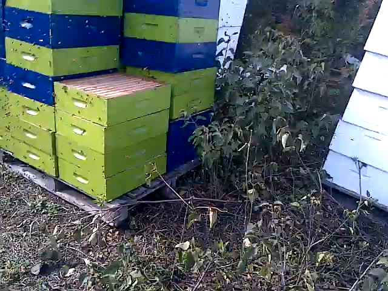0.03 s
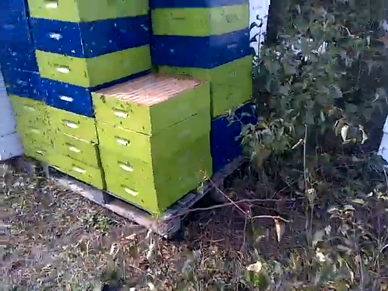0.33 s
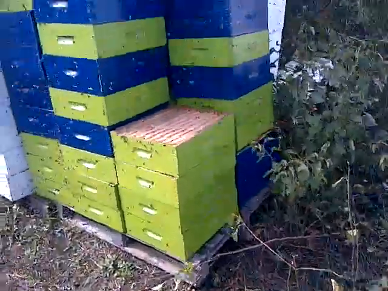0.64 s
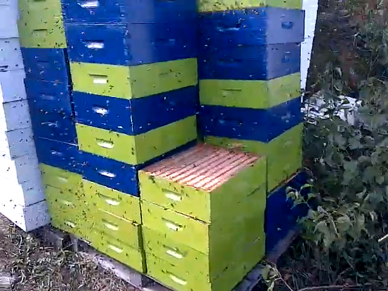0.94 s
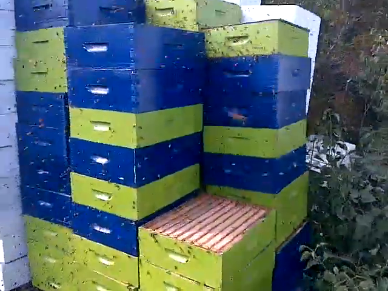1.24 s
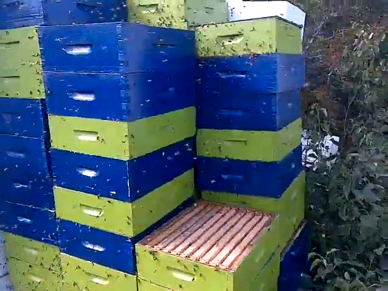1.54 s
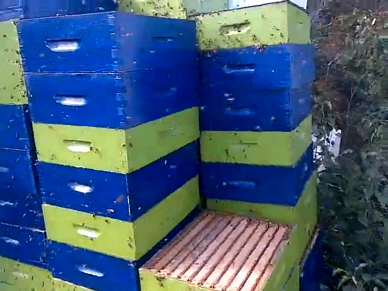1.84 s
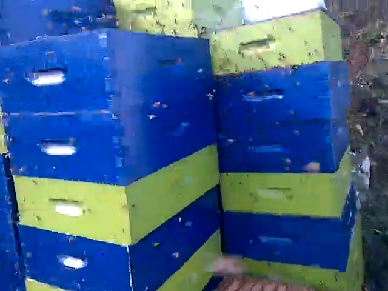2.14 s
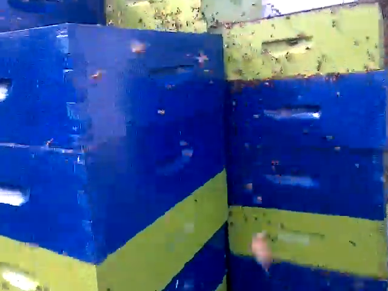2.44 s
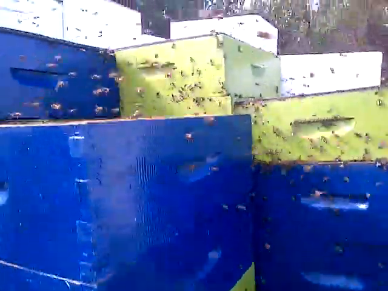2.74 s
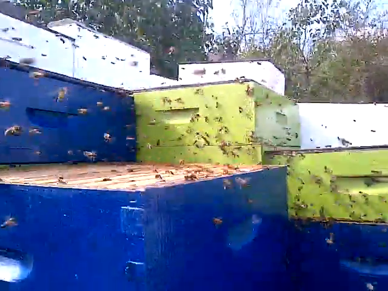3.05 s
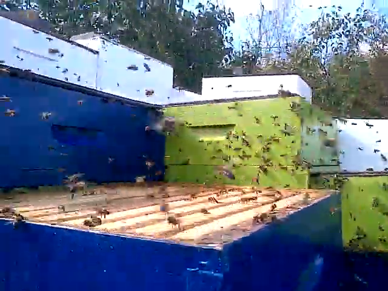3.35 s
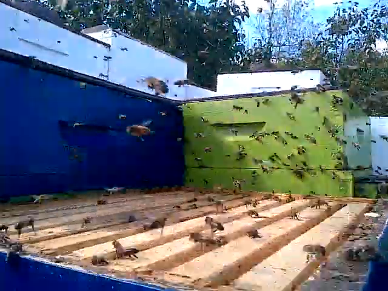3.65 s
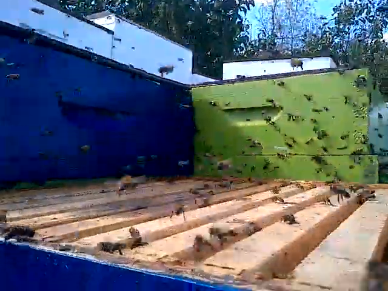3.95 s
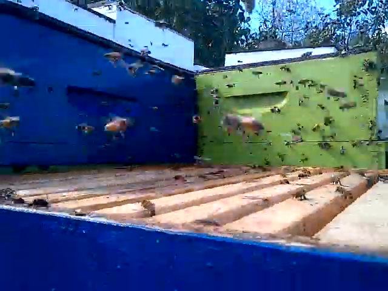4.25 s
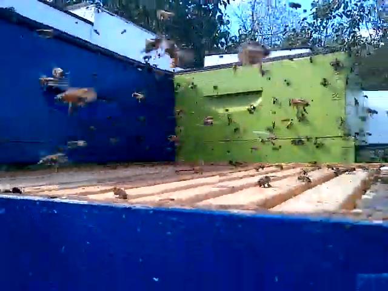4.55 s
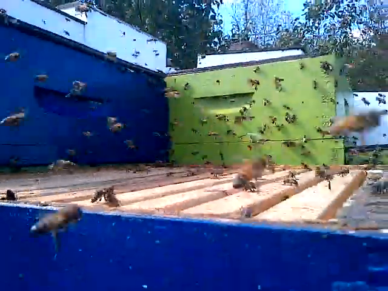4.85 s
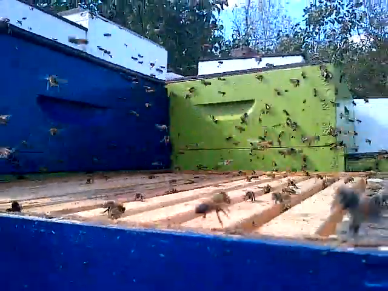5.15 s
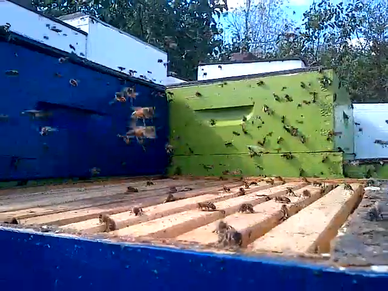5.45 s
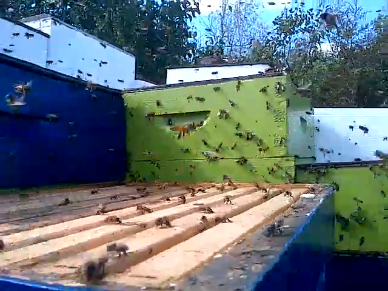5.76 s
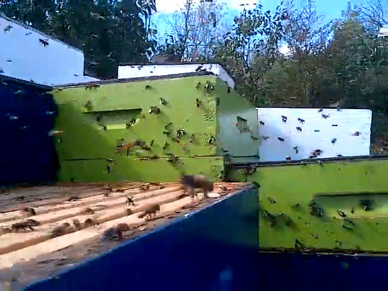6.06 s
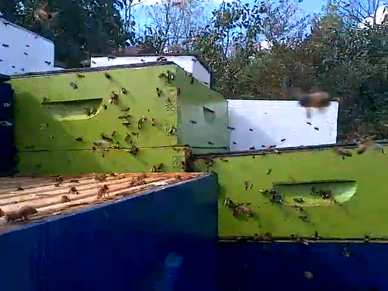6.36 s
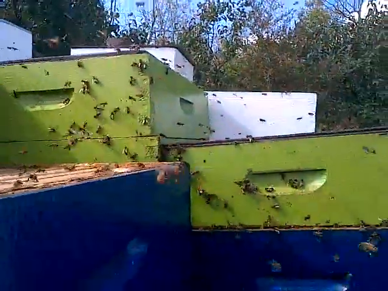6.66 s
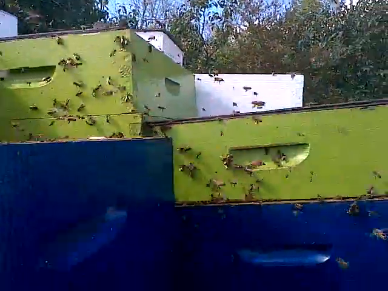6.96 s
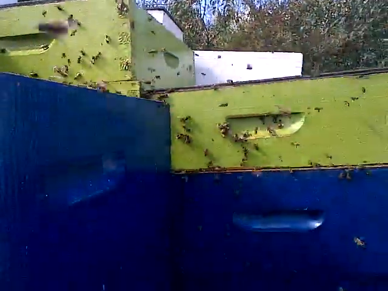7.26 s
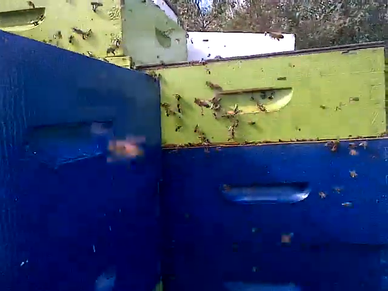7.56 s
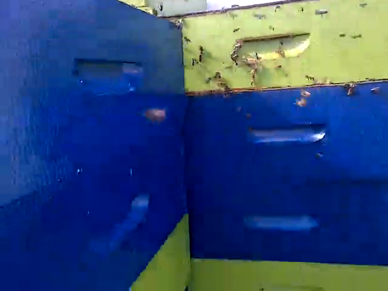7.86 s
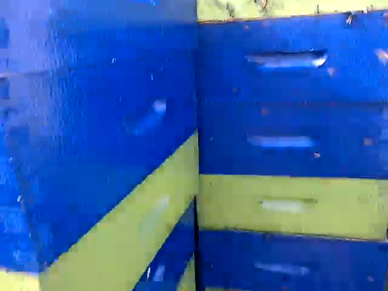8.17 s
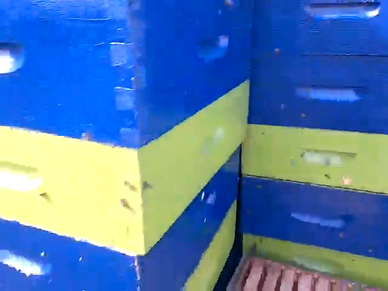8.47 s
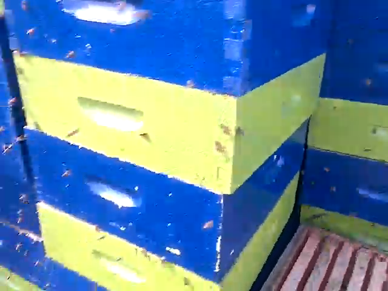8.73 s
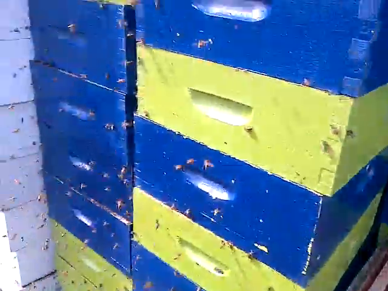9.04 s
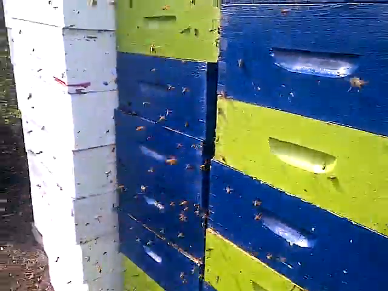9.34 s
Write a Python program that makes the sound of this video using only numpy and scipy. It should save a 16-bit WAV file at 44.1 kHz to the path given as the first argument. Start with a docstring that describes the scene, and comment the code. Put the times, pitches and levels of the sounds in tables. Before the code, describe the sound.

A dense swarm of honey bees buzzes louder and closer around hives, with light footsteps crunching dry leaves and twigs early on.

```python
"""Walking into a bee swarm

Honey bees swarm around wooden hives outdoors: many wingbeats blur into one rasping buzz that
throbs with brief, uneven swells of tone. Someone walks up over crackling leaves and snapping
twigs and holds the microphone into the thick of it. A faint low hum and moving air lie underneath."""
import sys
import numpy as np
from scipy import signal
from scipy.fft import rfft, irfft
from scipy.io import wavfile
from scipy.ndimage import uniform_filter1d, map_coordinates

SR = 44100
rng = np.random.default_rng(int(sys.argv[2]) if len(sys.argv) > 2 else 0)


def unload_audio(sound):
    """Save the sound as a 16-bit wav file, at the path given as the first command line argument."""
    columns = np.transpose(np.atleast_2d(sound))
    # keep every value between -1 and 1, then stretch to whole-number steps
    steps = np.round(np.clip(columns, -1, 1) * 32767)
    wavfile.write(sys.argv[1], SR, steps.astype(np.int16))


N = 423360
TIME = np.arange(N) / SR
THICK_DB = -36.5   # base level in the thick of the swarm; near_db is counted from here


def swarm(near_db, rasp_db=-1.17, air_db=-5.5, split_hz=2400):
    """The hum and rasp of the crowd over the rush of air from its wings, all growing with nearness."""
    # Air stirred by the wings. Each row: frequency in Hz, noise density in dB.
    wing_air = [(60, -23.5), (120, -23.5), (170, -5.5), (320, -0.5), (600, 0.5), (1200, -3), (2000, -5),
                (4000, -15), (7000, -31), (8000, -55.5)]
    beat, octave, rasp = crowd()
    body = signal.sosfiltfilt(signal.butter(4, split_hz, fs=SR, output="sos"), rasp)
    # In the near field, over the last dB of the approach, the wingbeat tone gets an extra lift.
    near_field_db = 4.5 * np.exp(np.minimum(near_db, 0) / .5)
    hum = from_db(-8 + 1.06 * near_db + near_field_db) * steady(beat)
    hum += from_db(-1 + .94 * near_db) * steady(octave)
    edge = from_db(-11 + .85 * near_db) * steady(rasp - body)
    air = from_db(air_db) * coloured(rng.standard_normal(N), wing_air)
    return from_db(THICK_DB) * (hum + edge + from_db(near_db) * (from_db(rasp_db) * steady(body) + air))


def crowd(wingbeat_hz=240.43, spread=.1, swerve=.033, flutter=.011, count=128, size=4096):
    """Many bees, each with its own wandering wingbeat and distance. Returns fundamental, octave, rasp."""
    hold = 30   # samples per flight step; the buzz is built at half rate
    times = TIME[::2 * hold]
    sine = np.sin(2 * np.pi * np.arange(size) / size)
    octave = np.tile(sine[::2], 2)
    out = np.zeros((3, len(times) * hold))
    for pitch in np.linspace(-1, 1, count):
        slowing = .16 * np.clip(wander(2, times) - 1, 0, 1)   # now and then a bee slows to land
        detune = spread * pitch + swerve * wander(5, times) + flutter * wander(28, times)
        beat_hz = wingbeat_hz * np.exp(detune - slowing)
        cycle = rng.random() + np.cumsum(np.repeat(beat_hz, hold)) * 2 / SR
        place = (cycle * size).astype(int) % size
        nearness = from_db(11 * np.tanh(wander(6, times) / 2))   # the crowd keeps some distance
        for part, shape in zip(out, (sine, octave, wing_stroke(wingbeat_hz, scatter_rad=1.38))):
            facing = from_db(2 * wander(8, times))   # each part beams its own way as the bee turns
            part += shape[place] * np.repeat(nearness * facing, hold)
    return signal.resample_poly(out, 2, 1, axis=1)[:, :N]


def wing_stroke(beat_hz, scatter_rad, size=4096):
    """One cycle of rasp: a sharp flick of the wings, smeared differently each time."""
    # Colour of the stroke from the third harmonic up. Each row: frequency in Hz, level in dB.
    rasp_colour = [(600, -3), (750, 2.5), (950, 1), (1250, 1), (1600, -2), (2000, -8.5), (2500, -11),
                   (3100, -12.5), (3800, -17), (5100, -17), (6000, -21.5), (6800, -32.5), (7600, -45)]
    orders = np.arange(3, 34)
    gains = gain_at(rasp_colour, orders * beat_hz) * from_db(rng.normal(0, 1.9, len(orders)))
    harmonics = np.zeros(size // 2 + 1, complex)
    harmonics[orders] = gains * np.exp(1j * rng.normal(0, scatter_rad, len(orders)))
    return rms_one(irfft(harmonics))


def buzz_surges(sag=.006, glide_s=.07, waver=.009, rasp_db=-8):
    """Brief, gliding swells of the swarm's hum: the throb of many wingbeats adding up by chance."""
    # Swells of tone. Each row: peak time in seconds, fundamental in Hz, level in dB, fundamental
    # against octave in dB, half length of the swell in seconds, pitch climb as a share per second.
    surges = [(1.19, 243.4, -59, 3, 0.03, 0.18), (1.33, 248.8, -50.5, -14, 0.049, .5),
              (1.55, 243.6, -46, -9, 0.023, .7), (1.71, 240.4, -43.5, -18, .03, 0.65),
              (1.799, 236, -43, -5, 0.019, -1.3), (1.91, 247.5, -53.5, 2, .04, 0.11),
              (1.991, 244.6, -48, -13, 0.02, 0), (2.319, 238.4, -42.5, -9, .035, -0.54),
              (2.377, 229, -44, -15, 0.016, -0.024), (2.76, 251, -44, -0.5, 0.041, .7),
              (2.82, 248, -40, -24.5, 0.031, 0), (3.03, 242.5, -37.5, -17, 0.024, -.7),
              (3.32, 241.2, -37.5, -21, 0.029, -.7), (3.47, 262, -46.5, 1.5, 0.02, .7),
              (3.53, 237, -38, -21, 0.043, 0), (3.819, 244.3, -38, -18, 0.036, .7),
              (3.882, 244.7, -48, 5, 0.045, 0.59), (4.01, 220.2, -39, -6, 0.031, 1.31),
              (4.169, 240, -42.5, 0.5, 0.045, -1.2), (4.33, 229.7, -37.5, -7, 0.029, 1.31),
              (4.43, 237.7, -37.5, -8, 0.028, -1.3), (4.669, 241, -49, 4.5, .03, 0),
              (4.751, 211, -34.5, -9, 0.035, 0.33), (4.757, 249, -35, -23, 0.03, 0),
              (4.86, 224.2, -40, -4, 0.026, 0.75), (5.20, 224.3, -42.5, 1, 0.054, -0.53),
              (5.40, 226, -42.5, -14, .035, 0.17), (5.67, 252.4, -39, -14, 0.049, 0),
              (5.794, 236.5, -36, -24, 0.042, 1.33), (5.89, 238.4, -44, -1, 0.02, -0.11),
              (6.00, 190, -48.5, -1.5, 0.068, -0.1), (6.00, 249, -39, -3, 0.027, .7),
              (6.12, 223.3, -40.5, -18, 0.045, -1.35), (6.33, 237.6, -38, -7, 0.04, -0.16),
              (6.68, 229, -39.5, -3.5, 0.034, -1.37), (6.799, 246.3, -45, 0, .028, 0),
              (6.87, 227, -39.5, -20, 0.035, 1), (7.10, 252, -42.5, -13, 0.045, -0.24),
              (7.46, 239.3, -45, -3, 0.028, 1.3), (7.62, 245, -43, -16, 0.024, 0),
              (7.70, 246, -42.5, -6, 0.036, 0.63), (8.14, 247.7, -41, -14, 0.036, .7),
              (8.28, 239.9, -38, -2, 0.067, 0), (8.54, 251.2, -39, -14, .04, 0),
              (8.86, 241.7, -41, -18, 0.046, 1.22), (9.34, 242, -46, -12, 0.026, 0),
              (9.529, 242, -46, -5, 0.04, -0.18)]
    out = np.zeros(N)
    for at_s, beat_hz, level_db, beat_db, half_s, climb in surges:
        span = np.abs(TIME - at_s) < .5
        offset = (TIME[span] - at_s) / half_s
        falloff = np.hypot(1, offset)
        glide = climb * glide_s * np.tanh(offset * half_s / glide_s)
        glide -= sag * offset / falloff   # a slight downward bend across the peak
        cycle = np.cumsum(beat_hz * (1 + glide + waver * wander(25, TIME[span]))) / SR
        stroke = wing_stroke(beat_hz, scatter_rad=1.07)
        hum = np.sqrt(2) * (from_db(beat_db) * np.sin(2 * np.pi * cycle) + np.sin(4 * np.pi * cycle))
        rasp = from_db(rasp_db) * stroke[(cycle % 1 * len(stroke)).astype(int)]
        envelope = np.hanning(len(cycle)) / falloff ** 2
        out[span] += from_db(level_db) * (hum + rasp) * envelope
    return out


def footsteps(cracks_per_s=1700, crack_s=.00059):
    """Each sole sets off a shower of tiny, uneven leaf cracks, dry bursts that die at once."""
    # Soles pressing down. Each row: peak time in seconds, level in dB, half length in seconds.
    steps = [(0.373, -58, 0.026), (0.478, -59.5, 0.024), (1.124, -59.5, 0.042), (1.234, -55, 0.025),
             (1.296, -56, 0.022), (1.38, -56.5, 0.085), (2.118, -51.5, 0.13), (2.258, -43.5, 0.017),
             (2.317, -36.5, 0.023), (2.388, -45.5, 0.04), (2.768, -44, 0.015), (2.835, -46.5, 0.016),
             (2.907, -45, 0.022), (3.04, -51.5, 0.17), (3.33, -42.5, 0.018)]
    # Crunch of dry leaves. Each row: frequency in Hz, noise density in dB.
    leaf_colour = [(100, -28), (250, -4.5), (500, -4), (1300, -2), (2300, -3.5), (3500, -2), (5200, -1),
                   (6300, -7), (7200, -20.5), (8000, -22.5)]
    onsets = rng.random(N) < cracks_per_s / SR
    cracks = onsets * from_db(2 * np.minimum(rng.exponential(1, N), 4))
    energy = signal.lfilter([1], [1, -np.exp(-2 / (crack_s * SR))], cracks ** 2 + 1e-18)
    return swells(steps) * coloured(np.sqrt(energy) * rng.standard_normal(N), leaf_colour)


def twigs(crack_s=.0011, splinter_db=-17, splinter_s=.0083, ring_db=4, size=2500):
    """A snap is a short, broad crack that barely rings in the twig, with a softer trail of splinters."""
    # Twigs and stalks breaking. Each row: start in seconds, level of the crack in dB, ring in Hz.
    snaps = [(0.4648, -56, 3150), (0.471, -59, 4200), (0.4775, -56, 3500), (1.0894, -53, 2800),
             (1.2337, -45, 2400), (1.3006, -43, 3400), (1.3092, -45.5, 2800), (1.3252, -46.5, 4200),
             (1.347, -50, 3680), (1.379, -47, 4500), (1.437, -45, 4300), (1.9486, -43, 2440),
             (2.063, -40, 3800), (2.0795, -43, 4240), (2.0976, -39, 3300), (2.147, -42.5, 4500),
             (2.176, -45, 4000), (2.295, -39, 3500), (2.3155, -36, 4000), (2.3204, -34, 2100),
             (2.3305, -38.5, 4600), (2.4094, -44, 5500), (2.6833, -44, 3870), (2.7572, -36.5, 2600),
             (2.763, -41, 4000), (2.8187, -37.5, 4800), (2.8335, -47, 2400), (2.9037, -33, 4600),
             (2.9107, -43, 4000), (2.9228, -45, 5500), (3.035, -42, 2570), (3.316, -42, 2800)]
    out = np.zeros(N)
    bright = np.vstack([signal.butter(3, 1500, "high", fs=SR, output="sos"),
                        signal.butter(12, 6400, fs=SR, output="sos")])
    envelope = np.exp(-TIME[:size] / crack_s) + from_db(splinter_db) * np.exp(-TIME[:size] / splinter_s)
    for at_s, level_db, ring_hz in snaps:
        burst = signal.sosfilt(bright, rng.choice([-1, 1], size) * envelope)
        snap = burst + from_db(ring_db) * signal.lfilter(*signal.iirpeak(ring_hz, 2, fs=SR), burst)
        crack = snap[TIME[:size] < .003]
        start = round(at_s * SR)
        out[start:start + size] += from_db(level_db) * snap / crack.std()
    return out


def draught(near_db, breeze_db=-81, among_bees_db=-65):
    """Air brushes the microphone: a faint breeze, more flow among the bees and a few short puffs."""
    # Puffs of air. Each row: peak time in seconds, level in dB, half length in seconds.
    puffs = [(0.792, -76, 0.038), (1.546, -78, 0.043), (2.317, -62, 0.11), (4.18, -69, 0.039),
             (4.806, -49.5, 0.03), (5.97, -71, .03), (6.86, -62, 0.037), (9.23, -63, .025),
             (9.487, -66, .018)]
    # Rumble of air on the microphone. Each row: frequency in Hz, noise density in dB.
    rumble = [(15, 8.5), (40, -9.5), (90, -6.5), (140, -3), (300, -17.5), (1000, -51)]
    flow = from_db(breeze_db) + from_db(among_bees_db + near_db)
    return (flow + swells(puffs)) * coloured(rng.standard_normal(N), rumble)


def low_hum(hz=106, peak_db=-69, peak_s=1.85, rise_db_per_s=9.5, fall_db_per_s=12.5):
    """A faint low tone that swells on the way to the hives and fades again."""
    past_s = TIME - peak_s
    level_db = peak_db + np.minimum(rise_db_per_s * past_s, -fall_db_per_s * past_s)
    return from_db(level_db) * np.sqrt(2) * np.sin(2 * np.pi * hz * TIME)


def from_db(db):
    return 10 ** (np.asarray(db) / 20)


def rms_one(x):
    return x / np.sqrt(np.mean(x ** 2) + 1e-20)


def gain_at(spectrum, hz):
    """Gain of an EQ curve whose points are joined on a log-frequency axis."""
    points_hz, db = np.transpose(spectrum)
    return from_db(np.interp(np.log(np.maximum(hz, 1)), np.log(points_hz), db))


def coloured(x, spectrum):
    """Shapes x with an EQ curve and sets its rms to 1."""
    return rms_one(irfft(rfft(x) * gain_at(spectrum, np.arange(N // 2 + 1) * SR / N), N))


def steady(x, size=SR // 8):
    """Rides the level to 1 over about a fifth of a second; faster beating stays."""
    return x / np.sqrt(uniform_filter1d(uniform_filter1d(x ** 2, size), size) + 1e-12)


def wander(per_s, times):
    """Smooth random drift through per_s new values a second, with a spread near 1."""
    return map_coordinates(rng.standard_normal(2048), [times * per_s], order=3, mode="wrap")


def swells(rows):
    """An envelope with one bell-shaped rise and fall for each row."""
    return sum(from_db(db) * np.exp(-.5 * ((TIME - at_s) / half_s) ** 2) for at_s, db, half_s in rows)


def scene():
    """The mono mix: one walk towards the hives drives the level of the swarm and of the moving air."""
    # Into the swarm and slowly back a little. Each row: time in seconds, base level of the buzz in dB.
    approach = [(0.14, -65.5), (0.6, -59.5), (1.25, -50.5), (1.7, -45), (2.1, -43.5), (2.65, -41),
                (3.5, -39.5), (3.9, -37.5), (4.9, -38.5), (5.5, -39.5), (6.9, -40), (8.0, -41), (9.6, -42)]
    near_db = np.interp(TIME, *np.transpose(approach)) - THICK_DB
    return (swarm(near_db) + buzz_surges() + footsteps() + twigs() + draught(near_db) + low_hum())[None]


def record(dry, opens_s=.135, cutoff_hz=8400):
    """The microphone opens after a moment, and a steep low-pass takes off the top."""
    opening = np.interp(TIME, [.035, opens_s, opens_s + .002], [0, .15, 1])
    return signal.sosfilt(signal.cheby2(12, 50, cutoff_hz, fs=SR, output="sos"), dry * opening)


dry = scene()
out = record(dry)
unload_audio(out)
```